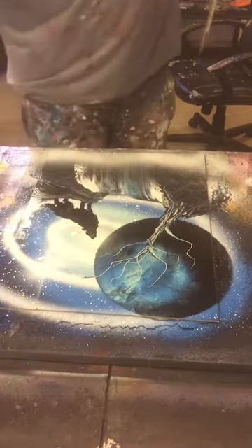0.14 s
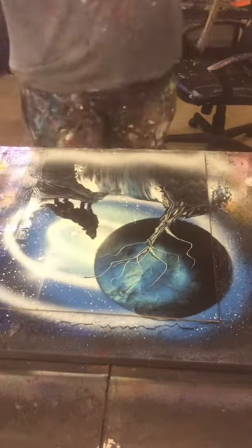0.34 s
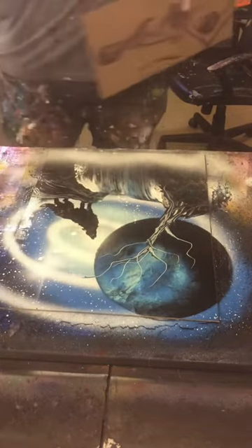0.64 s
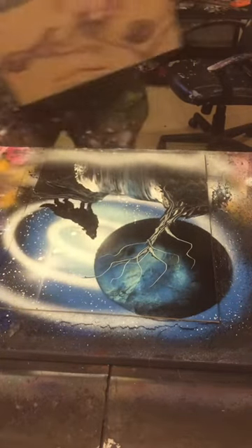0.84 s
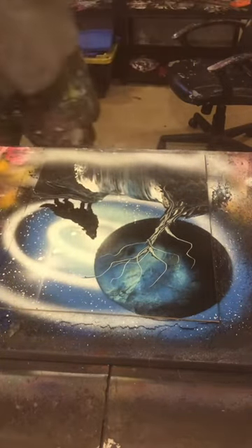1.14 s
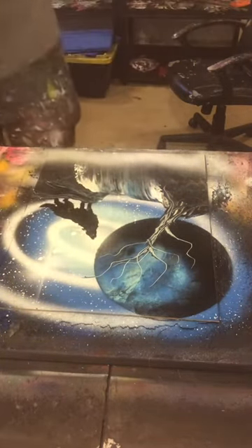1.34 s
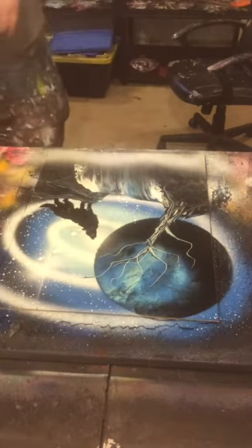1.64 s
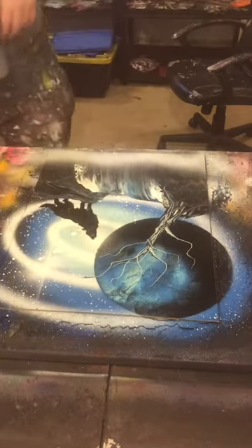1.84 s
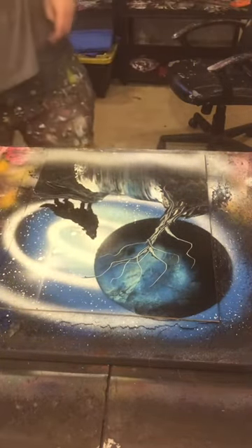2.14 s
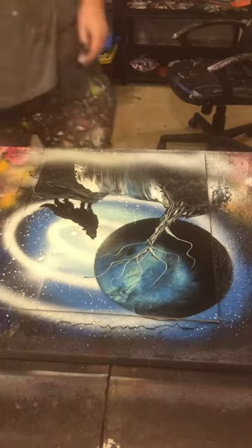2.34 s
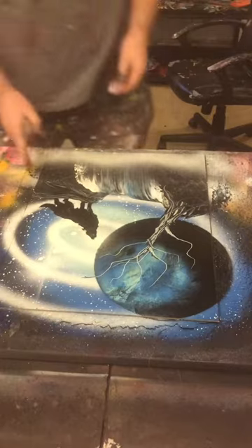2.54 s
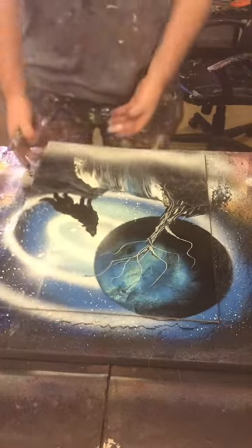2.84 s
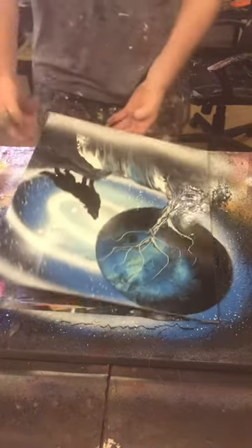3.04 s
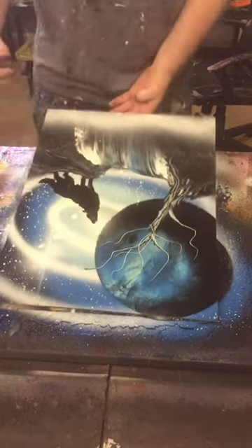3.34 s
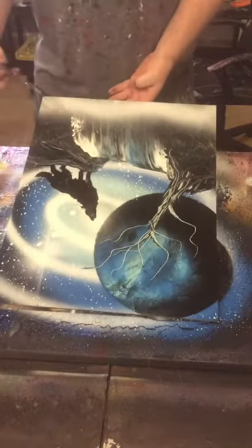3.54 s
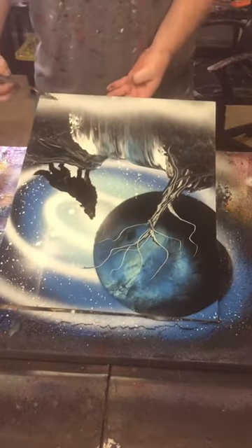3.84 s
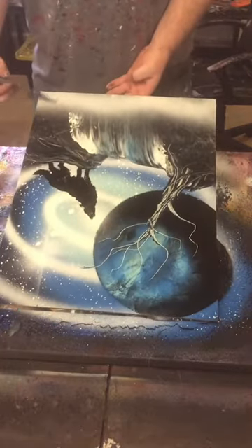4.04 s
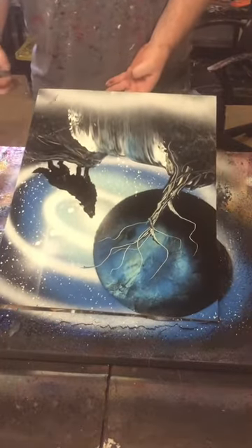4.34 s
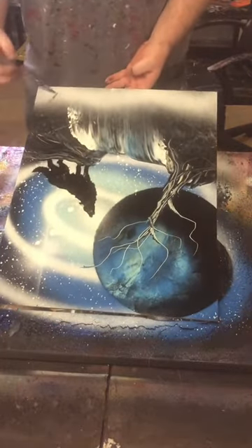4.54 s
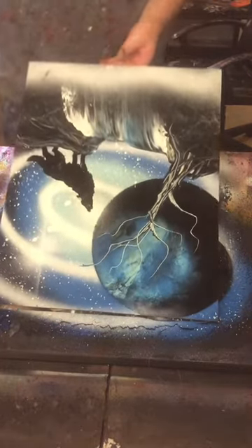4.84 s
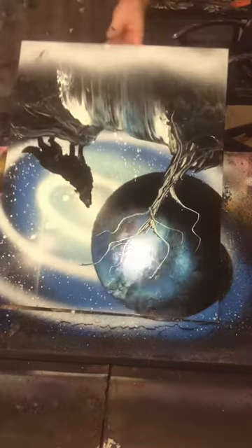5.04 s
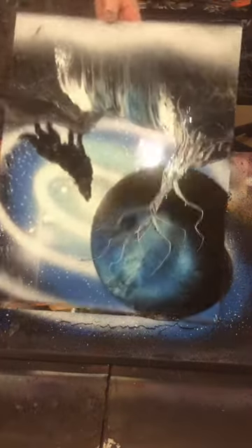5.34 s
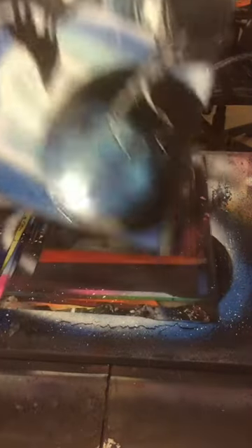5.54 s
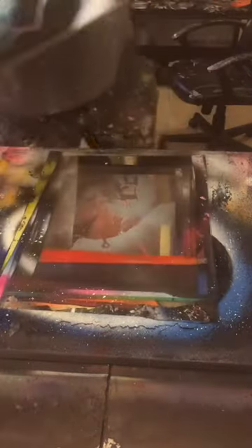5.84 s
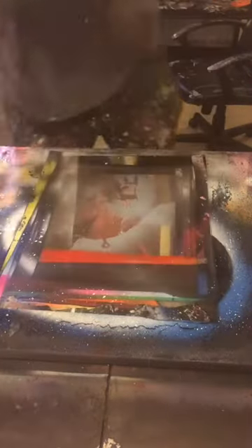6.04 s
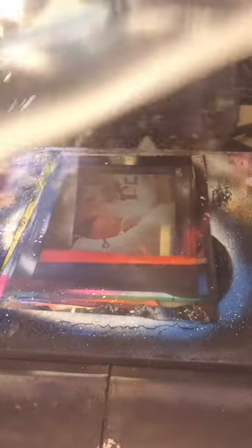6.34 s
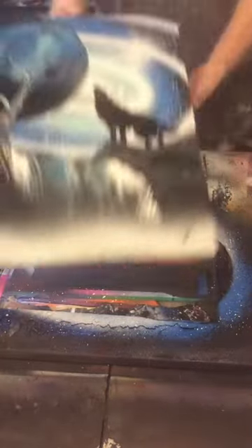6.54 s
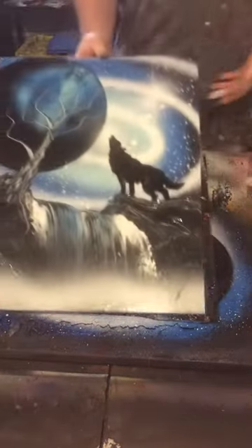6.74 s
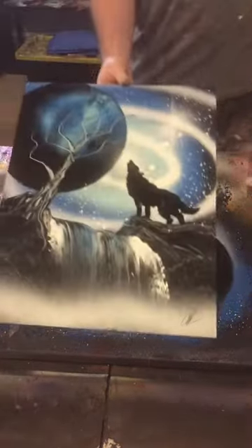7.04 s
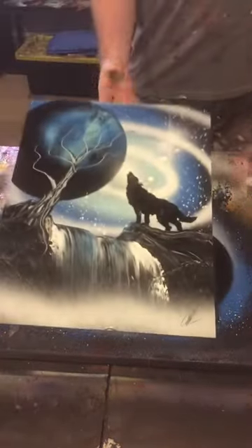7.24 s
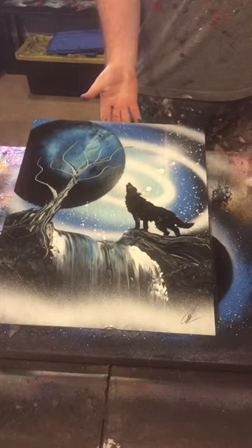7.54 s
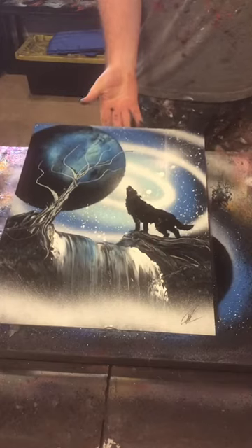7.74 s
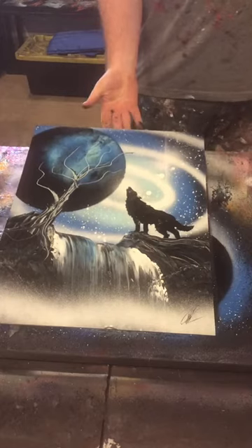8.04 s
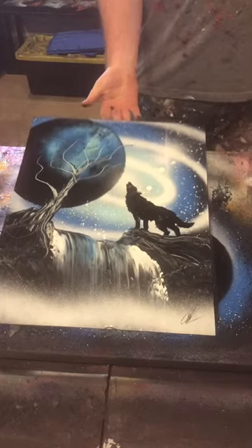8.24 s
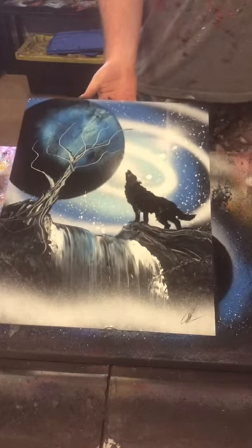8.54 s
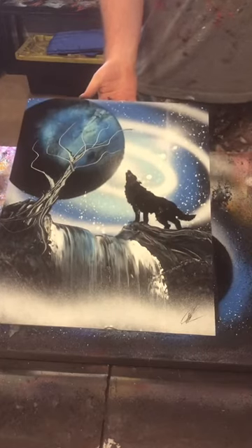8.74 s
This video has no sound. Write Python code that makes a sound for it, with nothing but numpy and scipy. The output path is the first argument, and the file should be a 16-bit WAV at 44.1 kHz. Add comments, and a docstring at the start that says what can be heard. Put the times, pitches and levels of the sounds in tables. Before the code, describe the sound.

A close microphone in a small, moderately live workroom, with faint room air and a weak wavering low hum. At 0 s the very end of a spray hiss snaps shut. From 0.25 to 0.65 s a mixing ball clacks irregularly in a thin can, strongest near 0.36, then skitters faintly; a firm thump on the table comes at 0.73. Small bumps follow around 1 s. From 1.47 to 2.05 s stiff boards clatter in a dense woody run with a bright swish. A tap at 2.7 and a strong, dull knock at 3.15. Between 3.8 and 4.6 s an edge drags in short, faintly squeaky pulls, growing louder. At 5.1 s comes the loudest slap, with lesser knocks until 5.7. Thin, airy finger skims near 5.9, a soft board swish at 6.5, faint taps around 7.1, then rustling fades into near silence by 9 s.

```python
"""Painted boards knock on a work table: modal ringing of panel and table, with noise bursts for dense modes.
They are dragged along an edge (stick-slip noise through resonances) and slid over each other (friction noise).
A spray can gives a last hiss (decaying noise) and thumps on the table (same synthesis as the knocks);
its mixing ball strikes and skitters (noise and wall modes). Fingers skim the paint (noise on a gliding carrier),
clothes rustle (coloured noise, snags), a sine hums in air noise; decaying noise gives the room's reflections."""
import sys
import numpy as np
from scipy import signal
from scipy.fft import rfft, irfft, next_fast_len
from scipy.io import wavfile
from scipy.ndimage import uniform_filter1d

SR = 44100
rng = np.random.default_rng(int(sys.argv[2]) if len(sys.argv) > 2 else 0)


def generate_wav(sig):
    """Save sig (samples, or channels by samples) to the path in sys.argv[1] as 16-bit PCM at SR."""
    pcm = np.round(np.clip(np.atleast_2d(sig).T, -1, 1) * 32767).astype(np.int16)
    wavfile.write(sys.argv[1], SR, pcm)


N = 392484
TIME = np.arange(N) / SR
BLOW_TIME = TIME[:SR // 2]   # time axis of one blow or slide


def from_db(db):
    """Decibels to amplitude ratio."""
    return 10 ** (np.asarray(db) / 20)


def rms_one(x):
    """Normalise to unit effective value."""
    return x / np.sqrt(np.mean(x ** 2) + 1e-20)


def at_hz(points, hz):
    """Interpolation of a table on a logarithmic frequency axis."""
    f, value = np.transpose(points)
    return np.interp(np.log(np.maximum(hz, 1)), np.log(f), value)


def cut(x, hz, kind, order=2):
    """Causal Butterworth low-, high- or band-pass filtering."""
    sos = signal.butter(order, np.clip(hz, 20, .45 * SR), kind, fs=SR, output="sos")
    return signal.sosfilt(sos, x)


def add(out, s, sound):
    """Superposition: mix a sound in at time s."""
    start = max(round(s * SR), 0)
    out[start:start + len(sound)] += sound[:N - start]


def colour(x, spectrum):
    """Spectral shaping of a steady signal, normalised to rms 1."""
    size = next_fast_len(len(x))
    gain = from_db(at_hz(spectrum, np.arange(size // 2 + 1) * SR / size))
    return rms_one(irfft(rfft(x, size) * gain, size)[:len(x)])


def wobble(per_s):
    """Random modulation: low-passed noise with unit spread."""
    moments = np.arange(0, 10, 1 / 4000)
    # drawn at 4000 values a second; the scaling puts the cutoff at per_s / 2 Hz
    slow = cut(rng.standard_normal(len(moments)), per_s * SR / 8000, "low")
    return np.interp(TIME, moments, rms_one(slow))


def friction(grain_db, per_s):
    """Friction noise: its strength varies as surface roughness catches and lets go."""
    return rms_one(rng.standard_normal(N) * from_db(grain_db * wobble(per_s)))


def stroke(length, rise, fall):
    """Sliding kinematics: speed builds up exponentially, holds and dies."""
    build = 1 - np.exp(-BLOW_TIME / rise)
    return build * np.exp(-np.maximum(BLOW_TIME - length, 0) / fall)


def arch(s, length):
    """Hand kinematics: speed follows a half sine from rest up to 1 and back."""
    return np.sin(np.pi * np.clip((TIME - s) / length, 0, 1)).clip(0)


def ticks(per_s, spread_db):
    """Random impulse train: tiny contacts at random moments and of random size."""
    sizes = from_db(spread_db * np.minimum(rng.exponential(1, N), 3)) * rng.choice([-1, 1], N)
    return sizes * (rng.random(N) < per_s / SR)


def burst(t60, size=SR // 2):
    """High modal density: many close modes, about equally strong, decay together as noise."""
    x = rng.standard_normal(size)
    decay = from_db(np.maximum(-60 * TIME[:size] / t60, -200))
    for _ in range(3):   # alternately flatten the spectrum and the envelope
        even = irfft(np.exp(1j * np.angle(rfft(x * decay))), size)
        envelope = np.abs(uniform_filter1d(even ** 2, int(t60 * SR / 10) + 8))
        x = even / np.sqrt(envelope + 1e-16)
    return x * decay


def ring(modes, spread_db, detune):
    """Modal superposition: contact and grip vary the strengths and pitches of each blow."""
    hz, db, t60 = np.transpose(modes)[:, :, None]
    hz = hz * (1 + detune * rng.standard_normal(hz.shape))
    strength = from_db(db + spread_db * rng.standard_normal(hz.shape)) * rng.choice([-1, 1], hz.shape)
    decay = np.exp(-np.log(1000) * BLOW_TIME / t60)
    return np.sum(strength * np.sin(2 * np.pi * hz * BLOW_TIME) * decay, axis=0)


def blow(x):
    """Energy normalisation: a blow gets the energy of 12 ms at rms 1."""
    return x / np.sqrt(np.sum(x ** 2) / (.012 * SR) + 1e-20)


def resonance(x, hz, width):
    """Two-pole resonance with unit gain at its peak and a given bandwidth."""
    r = np.exp(-np.pi * width / SR)
    poles = [1, -2 * r * np.cos(2 * np.pi * hz / SR), r * r]
    return (1 - r * r) / 2 * signal.lfilter([1, 0, -1], poles, x + 1e-18)


# Level of the hum before its wavering: (time [s], level [dB])
HUM_DB = [(0, -65), (6.3, -64.5), (7.5, -70), (8.9, -78)]
# Spectrum of the room air: (frequency [Hz], density [dB per Hz])
AIR_COLOUR = [(22, -34), (30, -11), (44, -9), (64, 4), (82, -15), (120, -4), (157, -7), (320, -9.5),
              (463, -14.5), (1160, -27.5), (5140, -31.5), (16000, -39)]
HUM_HZ, AIR_DB = 111.8, -66


def background(waver_db=2.0):
    """Tone and noise: a wavering low hum that fades towards the end, over coloured room air."""
    hum_db = np.interp(TIME, *np.transpose(HUM_DB)) + waver_db * wobble(per_s=3.7)
    hum = from_db(hum_db) * np.sqrt(2) * np.sin(2 * np.pi * HUM_HZ * TIME)
    air = colour(cut(rng.standard_normal(N), 28, "high"), AIR_COLOUR)
    return hum + from_db(AIR_DB) * air


# Decay of the room: (frequency [Hz], reverberation time T60 [s])
ROOM_T60 = [(80, 0.51), (250, 0.54), (600, 0.48), (1500, 0.54), (3800, 0.65), (7000, 0.43), (14000, 0.3)]
# Strength of the reverberation: (frequency [Hz], reverberant over direct level [dB])
ROOM_DB = [(80, -1), (250, -3.5), (600, -1.5), (1500, -2.5), (3800, -5.5), (7000, -5.5), (14000, -8.5)]


def reflections(gap=0.0013, build=0.0058):
    """Diffuse field: reflections build up after a gap [s] and decay band by band."""
    tail, edges = 0, 45 * 2 ** (np.arange(18) / 2)   # half-octave bands
    for low, high in zip(edges, edges[1:]):
        centre = np.sqrt(low * high)
        band = cut(burst(at_hz(ROOM_T60, centre), size=SR), [low, high], "band", order=4)
        share = np.sqrt((high - low) / (SR / 2) / np.sum(band ** 2))
        tail += from_db(at_hz(ROOM_DB, centre)) * band * share
    return tail * np.clip((TIME[:SR] - gap) / build, 0, 1)


def room(x, changes_per_s=2.6, count=3):
    """Time-varying reverberation: boards and body move, so one reflection pattern passes to the next."""
    out = np.zeros(N)
    for k in range(count):
        share = np.sqrt(2 / count) * np.cos(np.pi * (changes_per_s * TIME + k / count))
        out += signal.fftconvolve(x * share, reflections())[:N]
    return out


# Arm movements: (time [s], length [s], dull rubbing level [dB], cloth hiss level [dB])
MOVES = [(0.126, 1, -58, -67.5), (0.952, 1, -60.5, -69.5), (1.816, 0.35, -48.5, -79),
         (2.29, 0.94, -59.5, -77), (2.794, 0.91, -64.5, -72), (3.746, 0.87, -60.5, -76),
         (4.744, 0.13, -56, -67), (4.866, 1, -64, -71), (5.808, 0.26, -66, -74), (6.067, 0.5, -62, -70),
         (6.334, 0.43, -61, -75), (6.989, 0.43, -68.5, -70), (7.198, 0.54, -72, -77)]
# Spectrum of hands rubbing: (frequency [Hz], density [dB per Hz])
RUB_COLOUR = [(60, -11.5), (150, -4.5), (300, -4.5), (650, -1.5), (1300, -10), (3000, -13), (8000, -26.5)]
# Spectrum of rustling cloth: (frequency [Hz], density [dB per Hz])
CLOTH_COLOUR = [(500, -16), (2000, -5), (4000, 5), (7000, 0.5), (9500, 2), (12000, -2), (16000, -5)]
MOVE_SWELL = 0.4   # level follows the speed of the arm or finger to this power
REST_RUB_DB, REST_CLOTH_DB = -78, -85.5   # the body is never quite still
CRACKLES_PER_S, CRACKLE_DB = 69, -4   # small snags in the cloth, relative to its hiss
SCUFFS_PER_S, SCUFF_DB, SCUFF_TOP_HZ = 14, -0.5, 554   # soft bumps of the fingers, relative to rubbing


def handling(snag_t60=0.017, scuff_t60=0.043):
    """Friction noise with random impacts: hands rub and bump, clothes rustle and snag with each movement."""
    rub_level, cloth_level = from_db(REST_RUB_DB), from_db(REST_CLOTH_DB)
    for s, length, rub_db, cloth_db in MOVES:
        swell = arch(s, length) ** MOVE_SWELL
        rub_level = np.hypot(rub_level, from_db(rub_db) * swell)   # powers add
        cloth_level = np.hypot(cloth_level, from_db(cloth_db) * swell)
    snags = signal.fftconvolve(ticks(CRACKLES_PER_S, spread_db=2.0), burst(snag_t60))[:N]
    snags = from_db(CRACKLE_DB) * rms_one(snags)
    scuffs = signal.fftconvolve(ticks(SCUFFS_PER_S, spread_db=1.5), burst(scuff_t60))[:N]
    scuffs = from_db(SCUFF_DB) * colour(cut(scuffs, SCUFF_TOP_HZ, "low"), RUB_COLOUR)
    rub = rms_one(colour(friction(grain_db=3.0, per_s=23), RUB_COLOUR) + scuffs)
    cloth = colour(friction(grain_db=1.0, per_s=120) + snags, CLOTH_COLOUR)
    return rub_level * rub + cloth_level * cloth


# Fingers skimming the paint:
# (time [s], length [s], level at full speed [dB], hiss centre at full speed [Hz], half width [Hz])
SKIMS = [(3.211, 0.52, -74.5, 12100, 1530), (4.841, 0.2, -64.5, 9690, 900), (5.516, 0.38, -71, 11960, 1210),
         (5.899, 0.068, -52, 9860, 1970), (5.959, 0.37, -62, 10000, 2180), (7.125, 0.035, -62, 9800, 1280),
         (7.142, 0.68, -74, 11700, 601)]
SKIM_SLOW_SHARE = 0.69   # pitch at either end of a skim, as a share of its top


def skims():
    """Narrow-band friction: skin on a fine surface hisses at a pitch and level that follow its speed."""
    out, skin = np.zeros(N), friction(grain_db=0.5, per_s=80)
    for s, length, db, top_hz, half_width_hz in SKIMS:
        speed = arch(s, length)
        centre_hz = top_hz * (SKIM_SLOW_SHARE + (1 - SKIM_SLOW_SHARE) * speed)
        ridges = np.sin(2 * np.pi * np.cumsum(centre_hz) / SR)
        hiss = rms_one(cut(skin, half_width_hz, "low")) * ridges
        out += from_db(db) * speed ** MOVE_SWELL * hiss
    return out


# Boards sliding over each other: (time [s], length [s], level at full speed [dB], low-pass cutoff [Hz])
SWISHES = [(0.962, .02, -53, 12000), (1.003, 0.08, -53, 12000), (1.188, 0.068, -56, 4470),
           (1.467, 0.032, -36.5, 12540), (2.715, 0.04, -44.5, 11400), (2.769, 0.0097, -39.5, 13100),
           (2.801, 0.039, -52, 8550), (2.857, 0.024, -54, 9000), (3.001, 0.048, -59, 8900),
           (4.566, 0.0077, -48.5, 17000), (5.122, 0.013, -41.5, 19700), (5.81, 0.012, -56.5, 14080),
           (6.36, 0.04, -58, 4500), (6.482, 0.093, -44.5, 6180), (7.144, 0.1, -65, 7040)]
# Spectrum of the slide before that cutoff: (frequency [Hz], density [dB per Hz])
SWISH_COLOUR = [(150, -13.5), (400, -0.5), (800, 1), (1400, -5), (2500, -4.5), (5000, -8), (9000, -8.5),
                (16000, -3)]


def swishes():
    """Sliding friction: flat faces pass each other, each slide with its own brightness."""
    out, rub = np.zeros(N), colour(friction(grain_db=-2.0, per_s=860), SWISH_COLOUR)
    for s, length, db, bright_hz in SWISHES:
        speed = stroke(length, rise=0.0015, fall=0.021)
        start = rng.integers(N - len(speed))
        piece = rms_one(cut(rub[start:start + len(speed)], bright_hz, "low"))
        add(out, s, from_db(db) * speed * piece)
    return out


# Spectrum of the paint jet: (frequency [Hz], density [dB per Hz])
SPRAY_COLOUR = [(1000, -7.5), (2200, 0.5), (4000, 2), (8000, 4), (11500, 9), (16000, 2)]


def spray(db=-34.5, shut_s=0.0059, t60=0.086):
    """Turbulent jet noise: the last moment of a jet of paint, dying as the valve shuts."""
    jet = from_db(db - 60 * np.maximum(TIME - shut_s, 0) / t60)
    return jet * colour(rng.standard_normal(N), SPRAY_COLOUR)


ROLL_START_S, ROLL_LENGTH_S, ROLL_DB, ROLL_TICKS_PER_S = 0.53, 0.28, -60, 52


def rolling(tick_t60=0.029, low_hz=1900, high_hz=7500):
    """Rolling contact: the ball skitters round the bottom of the can in fine random ticks."""
    grains = signal.fftconvolve(ticks(ROLL_TICKS_PER_S, spread_db=2.0), burst(tick_t60))[:N]
    swell = np.sqrt(arch(ROLL_START_S, ROLL_LENGTH_S))
    return from_db(ROLL_DB) * swell * rms_one(cut(grains, [low_hz, high_hz], "band"))


# Mixing ball striking the can, a glancing hit touching twice: (time [s], level [dB], low-pass cutoff [Hz])
CAN_HITS = [(0.246, -50.5, 3200), (0.252, -43.5, 8600), (.256, -49, 8800), (0.323, -50.5, 6940),
            (0.3571, -26, 5480), (0.3719, -31.5, 5470), (0.4557, -40.5, 5000), (.458, -37, 8000),
            (0.512, -40, 5900), (.569, -43, 6000), (0.5946, -48, 5980), (0.6225, -47, 6900),
            (0.627, -40.5, 7050), (0.6549, -44, 4500)]
# Thin steel wall damped by the paint, before random variation:
# (frequency [Hz], relative level [dB], decay time T60 [s])
CAN_MODES = [(1140, 5, 0.014), (1900, 6.5, 0.018), (2370, 6, 0.03), (2420, 8.5, 0.028), (3650, 4.5, 0.018),
             (4030, 15, 0.013), (4440, 8.5, 0.016), (5940, 6.5, .014), (6420, 12.5, .012), (7500, 1, 0.013)]
CAN_CONTACT_T60_S = 0.021


def can(ring_db=-0.5, low_hz=1100, rim_low_hz=2000, rim_high_hz=5000, rim_db=1.5):
    """Impact excitation: a hard clack, strongest in the range of the rim, leaves the steel wall ringing."""
    out = np.zeros(N)
    for s, db, bright_hz in CAN_HITS:
        force = burst(CAN_CONTACT_T60_S)
        rim = from_db(rim_db) * cut(force, [rim_low_hz, rim_high_hz], "band", order=1)
        clack = blow(cut(force, low_hz, "high") + rim)
        wall = from_db(ring_db) * blow(ring(CAN_MODES, spread_db=2.5, detune=0.035))
        add(out, s, from_db(db) * blow(cut(clack + wall, bright_hz, "low", order=1)))
    return out


# Edge dragged over the table in pulls:
# (time [s], length [s], level at full speed [dB], low-pass cutoff [Hz])
DRAGS = [(3.793, 0.0073, -46, 2800), (3.831, 0.044, -57.5, 1900), (3.915, 0.049, -63, 1400),
         (4.034, 0.032, -58, 3200), (4.13, 0.019, -50.5, 5500), (4.215, 0.054, -62.5, 1400),
         (4.314, 0.056, -53.5, 2320), (4.401, 0.072, -51.5, 3800), (4.484, 0.043, -46.5, 3860),
         (4.555, 0.031, -41.5, 9200)]
# Resonances of the dragged board: (frequency [Hz], bandwidth [Hz], level before random shifts [dB])
DRAG_RESONANCES = [(1297, 22, 3.5), (1795, 200, -10), (2300, 57, -4), (2460, 55, -3), (2870, 50, -1.5),
                   (3280, 40, -5), (3890, 110, -2.5), (5690, 66, -2), (7680, 140, -11.5), (9490, 144, -6),
                   (10700, 77, -9)]


def drags(hiss_db=-4.0, shift_db=3.0):
    """Stick-slip: short pulls make the board sing, its leading resonance changing as the contact moves."""
    out, slips, voice = np.zeros(N), friction(grain_db=2.5, per_s=210), 0
    for k, (hz, width, db) in enumerate(DRAG_RESONANCES):
        level = (-1) ** k * from_db(db + shift_db * wobble(per_s=35))
        voice = voice + level * resonance(slips, hz, width)
    hiss = rms_one(cut(slips, [1900, 15000], "band", order=1))
    voice = rms_one(voice) + from_db(hiss_db) * hiss
    for s, length, db, bright_hz in DRAGS:
        pull = stroke(length, rise=0.012, fall=0.0075)
        piece = voice[round(s * SR):][:len(pull)]
        add(out, s, from_db(db) * pull * rms_one(cut(piece, bright_hz, "low", order=1)))
    return out


# Work table modes, before random variation: (frequency [Hz], relative level [dB], decay time T60 [s])
TABLE_MODES = [(93.3, -4, 0.23), (149.5, -5, 0.25), (168.9, -1.5, 0.15), (214, -8, 0.1), (280.1, -5, 0.12),
               (314, -2.5, 0.12), (353.8, 0.5, 0.21)]
# Painted board modes, likewise: (frequency [Hz], relative level [dB], decay time T60 [s])
BOARD_MODES = [(410, -3.5, 0.13), (488.1, 5.5, 0.11), (599, -2, 0.22), (655, 0, 0.47), (708, -3, 0.36),
               (777, -0.5, 0.22), (820, -2, 0.1), (968, 0.5, 0.2), (1120, -7, 0.17), (1308, -8.5, 0.25)]
# Higher board modes woken by an edge blow: (frequency [Hz], relative level [dB], decay time T60 [s])
EDGE_MODES = [(1810, -1.5, 0.21), (1996, 2, 0.25), (2480, -2, 0.11), (3398, -1.5, 0.23)]
BENDING_HZ = 229   # below this, bending waves cross the board slowly and arrive late


def body(x, width_hz=42, resonant_db=-12.0, plain_db=-2.5, count=5):
    """Damped resonance and dispersion: board and table modes colour every blow, whose lows lag behind."""
    modes = 0
    for hz, db, _ in TABLE_MODES + BOARD_MODES + EDGE_MODES:
        modes = modes + from_db(db) * resonance(x, hz, width_hz)
    x = from_db(plain_db) * x + from_db(resonant_db) * modes
    pole = np.exp(-2 * np.pi * BENDING_HZ / SR)
    for _ in range(count):   # all-pass: delays without changing levels
        x = signal.lfilter([-pole, 1], [1, -pole], x)
    return x


# Knocks of boards, and first the can's low thump on the table:
# (time [s], knock level before body() [dB], table thud re knock [dB],
# contact hardness as low-pass cutoff [Hz], knock pitch [Hz], free ringing re knock [dB])
KNOCKS = [(.373, -40.5, -24, 2400, 585, -11), (.732, -29, -7.5, 4340, 750, -26),
          (0.7632, -45.5, 9, 3060, 455, 3), (0.967, -43, 1.5, 4300, 560, -9.5),
          (1.023, -48.5, -21, 2480, 750, -9), (1.199, -48.5, -3, 3230, 741, 0),
          (1.313, -49.5, -0.5, 1500, 617, -11), (1.47, -34, -2.5, 8360, 736, -6),
          (1.4877, -35, -2, 9200, 650, -3), (1.5547, -33, -22, 4900, 1050, -1),
          (1.591, -29.5, -1, 7360, 645, -10), (1.6001, -28, 4.5, 10700, 605, -5),
          (1.616, -28.5, -7, 3580, 515, 1), (1.632, -33, -7, 4500, 800, -6.5),
          (1.661, -28.5, -25, 3700, 661, -3), (1.761, -29, -5, 7440, 597, 2.5),
          (1.85, -34, 2.5, 6700, 550, -5), (2.039, -39, -10, 6200, 750, -1.5),
          (2.343, -59, 4, 1284, 480, -10), (2.721, -39, -1.5, 5230, 546, -12),
          (3.017, -49.5, 6.5, 2000, 484, -14), (3.151, -23, -4.5, 1450, 525, -15),
          (5.036, -50.5, -16.5, 6500, 1780, -14), (5.102, -15, -10, 2900, 637, -14),
          (5.105, -24, -0.5, 5030, 590, -2.5), (5.1103, -21, -5.5, 1300, 570, -7),
          (5.131, -31, -7, 6950, 585, -9), (5.241, -30.5, -25, 2980, 610, -21),
          (5.365, -30.5, -10, 3620, 676, -13.5), (5.512, -47, -5, 2290, 690, -9),
          (5.632, -44, -10, 3450, 680, -5), (5.68, -49.5, -2, 4130, 444, -10),
          (5.817, -56.5, 9, 1500, 250, -9), (6.202, -60, 7.5, 2770, 500, -8.5),
          (6.386, -44.5, -8, 1400, 570, -1), (6.4893, -45, -5.5, 6300, 576, 9),
          (6.8346, -51, -0.5, 998, 714, -14.5), (7.031, -63.5, 7.5, 904, 401, -8),
          (7.059, -54, 1.5, 3600, 565, -8.5), (7.099, -54.5, -1.5, 1810, 650, 1),
          (7.136, -50.5, -0.5, 4170, 516, -16.5), (7.205, -62, -14, 6000, 600, -7)]
# the harder the contact, the more the edge cracks
CRACK_DB, CRACK_AT_HZ, CRACK_DB_PER_OCTAVE = -2.5, 5050, 11
# after a blow the loose edge chatters on in tiny impacts
REBOUNDS_PER_S, REBOUND_DB, REBOUND_T60_S = 190, -5, 0.2


def knocks(thud_t60=0.15, knock_t60=.036, crack_t60=0.036, edge_ring_db=-12.5, thud_ring_db=-4.0,
           lowest_hz=60, knock_span=1.584, clatter_db=-6.5):
    """Coupled impact: edge cracks, panel rings, table thuds; the can's thump shares this synthesis."""
    out = np.zeros(N)
    rebounds = signal.fftconvolve(ticks(REBOUNDS_PER_S, spread_db=4.0), burst(0.011))
    rebound_decay = np.exp(-np.log(1000) * BLOW_TIME / REBOUND_T60_S)
    for s, db, weight_db, bright_hz, knock_hz, ring_db in KNOCKS:
        thud = blow(cut(burst(thud_t60), [125, 400], "band", order=3))
        table = from_db(thud_ring_db) * blow(ring(TABLE_MODES, spread_db=1, detune=0.018))
        thud = blow(cut(thud + table, lowest_hz, "high"))

        chatter = blow(rebounds[round(s * SR):][:len(BLOW_TIME)] * rebound_decay)

        # the place of contact sets the pitch of the knock
        knock_band = [knock_hz / knock_span, knock_hz * knock_span]
        knock = blow(burst(knock_t60)) + from_db(clatter_db) * chatter
        knock = blow(cut(knock, knock_band, "band", order=2))
        panel = cut(ring(BOARD_MODES, spread_db=3.5, detune=.008), lowest_hz, "high")
        panel = from_db(ring_db) * blow(panel)
        knock = blow(cut(knock + panel, bright_hz, "low"))   # a soft contact reaches no high modes

        crack = cut(blow(burst(crack_t60)) + from_db(REBOUND_DB) * chatter, 900, "high")
        favoured = from_db(-4.0) * cut(crack, [1300, 2500], "band", order=1)   # thin panel, near 2 kHz
        crack = blow(cut(crack + favoured, bright_hz, "low"))
        edge = blow(cut(ring(EDGE_MODES, spread_db=2.5, detune=0.024), bright_hz, "low"))
        crack = blow(crack + from_db(ring_db + edge_ring_db) * edge)
        crack_db = CRACK_DB + CRACK_DB_PER_OCTAVE * np.log2(bright_hz / CRACK_AT_HZ)

        add(out, s, from_db(db) * (knock + from_db(weight_db) * thud + from_db(crack_db) * crack))
    return body(out)


def scene():
    """Superposition of direct and reverberant sound: ball and spray feed the room 1.5 dB more strongly."""
    tin = can() + rolling() + spray()
    boards = knocks() + swishes() + drags() + skims() + handling()
    reverberant = room(from_db(1.5) * tin + boards)
    return (tin + boards + reverberant + background())[None]


CUTOFF_HZ = 16100


def record(dry):
    """Band limitation: a steep elliptic low-pass removes the top."""
    return signal.sosfilt(signal.ellip(10, .2, 80, CUTOFF_HZ, fs=SR, output="sos"), dry)


dry = scene()
out = record(dry)
generate_wav(out)
```